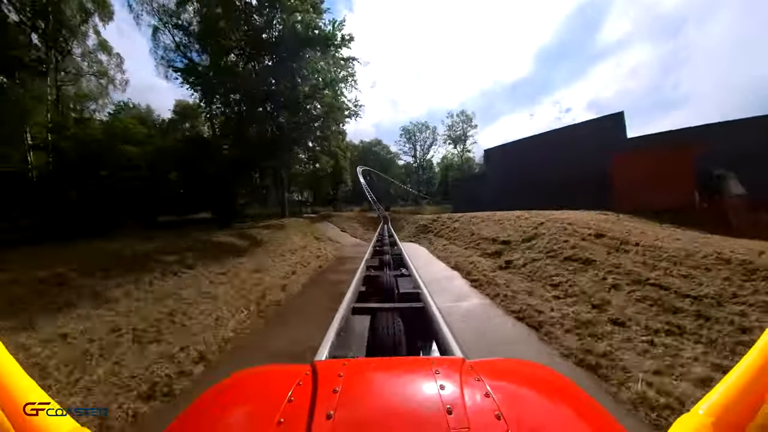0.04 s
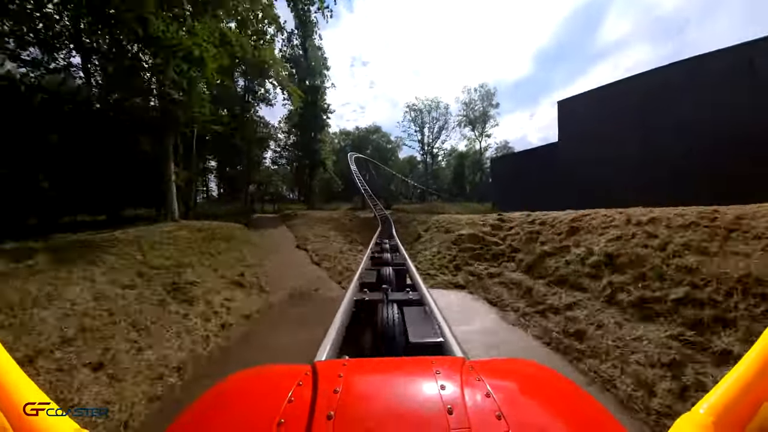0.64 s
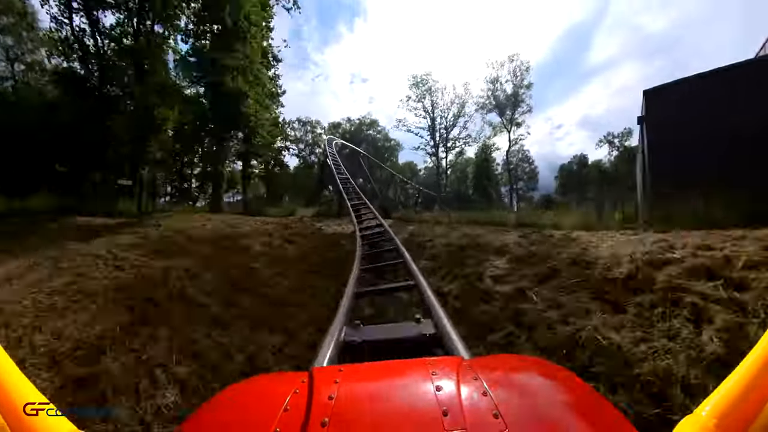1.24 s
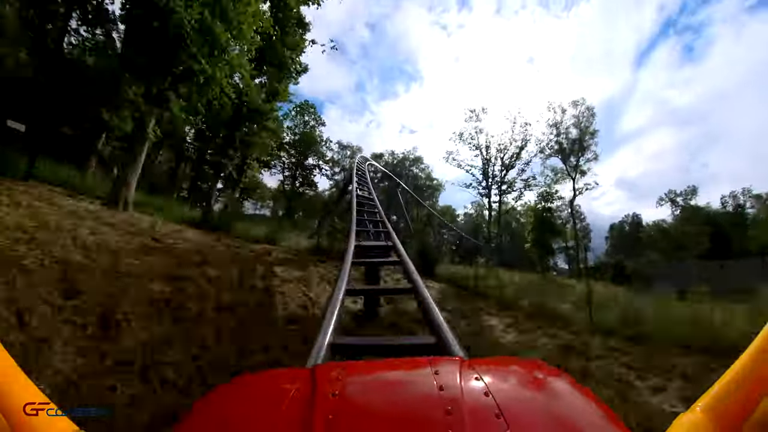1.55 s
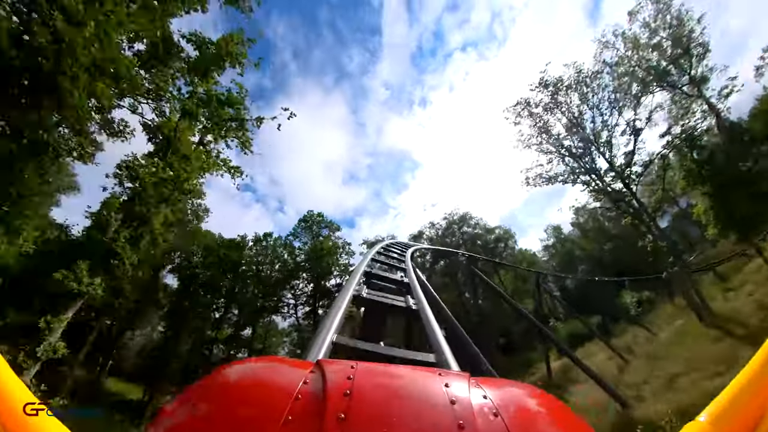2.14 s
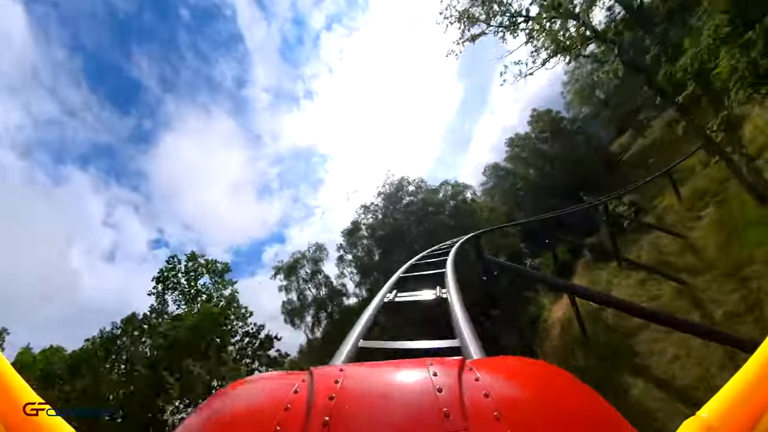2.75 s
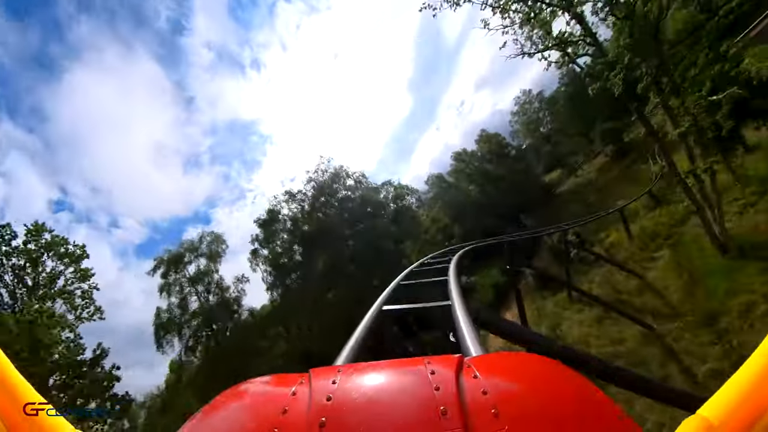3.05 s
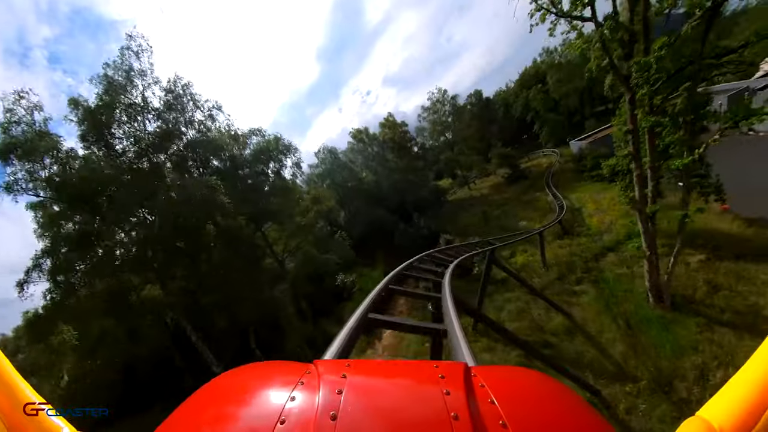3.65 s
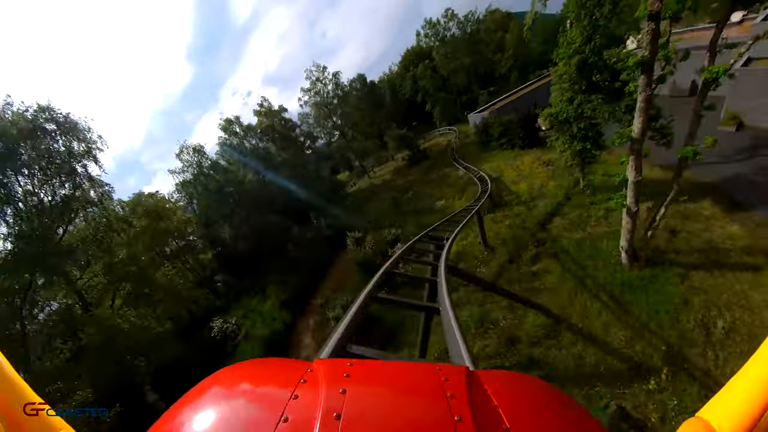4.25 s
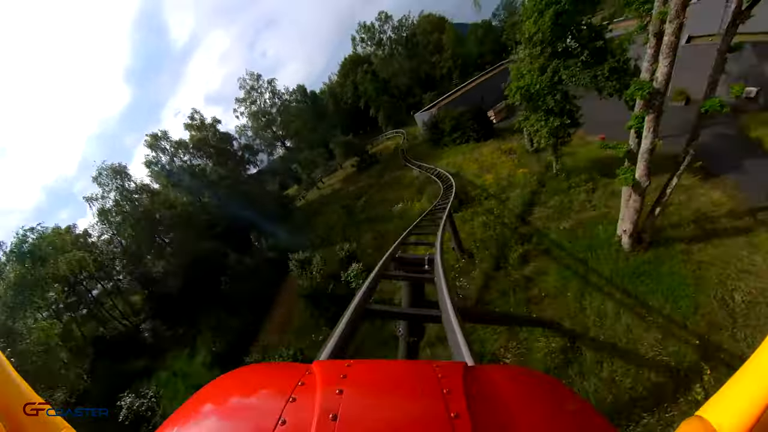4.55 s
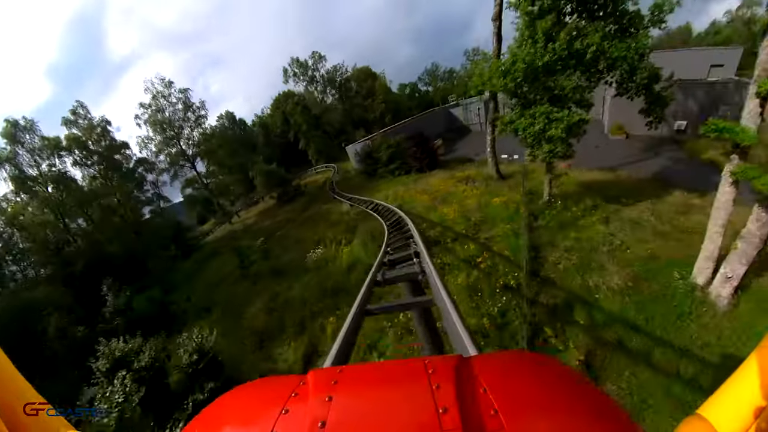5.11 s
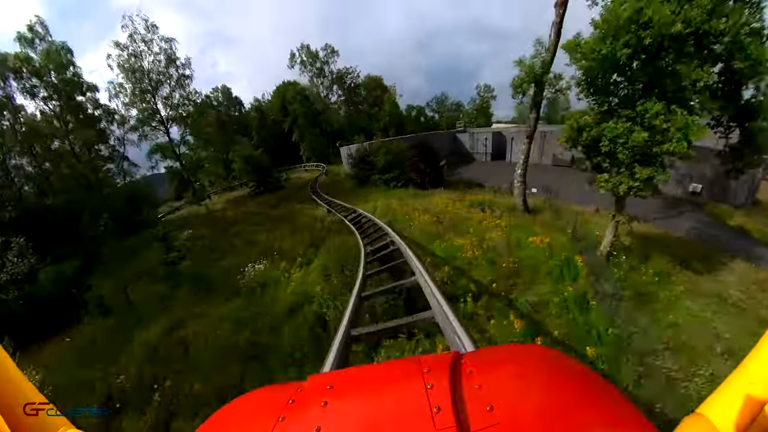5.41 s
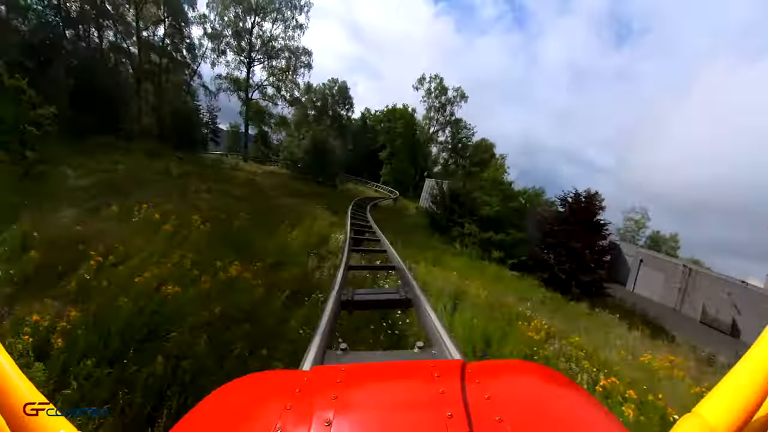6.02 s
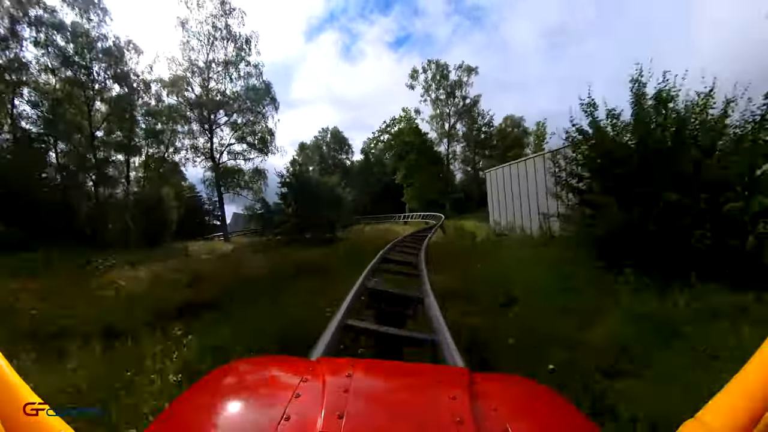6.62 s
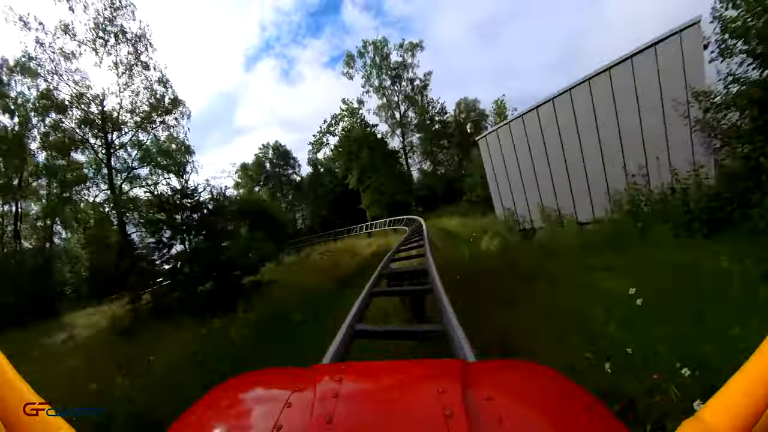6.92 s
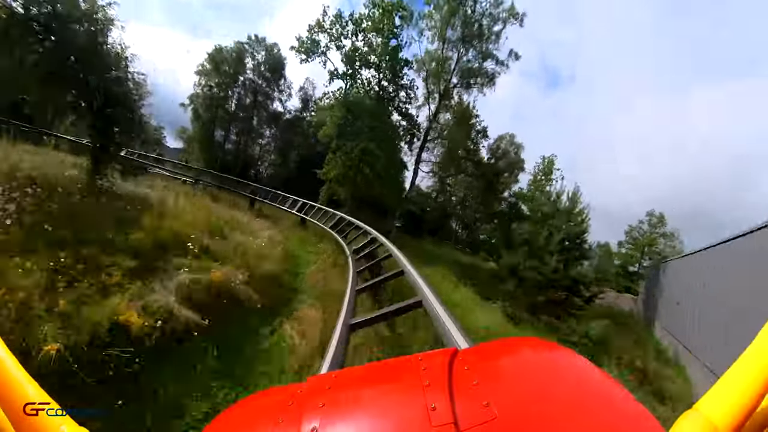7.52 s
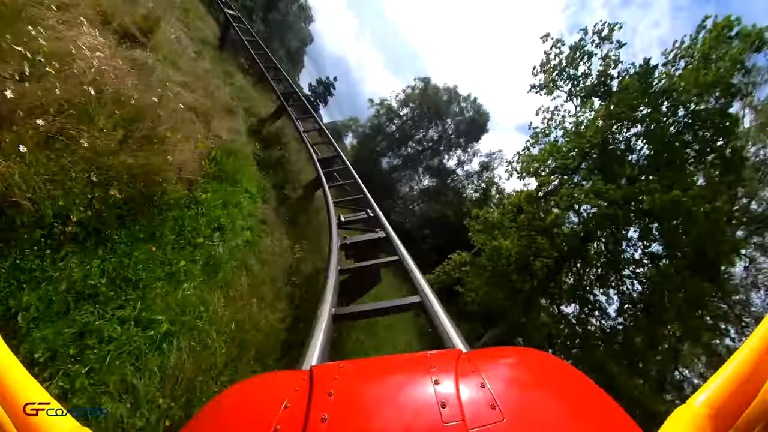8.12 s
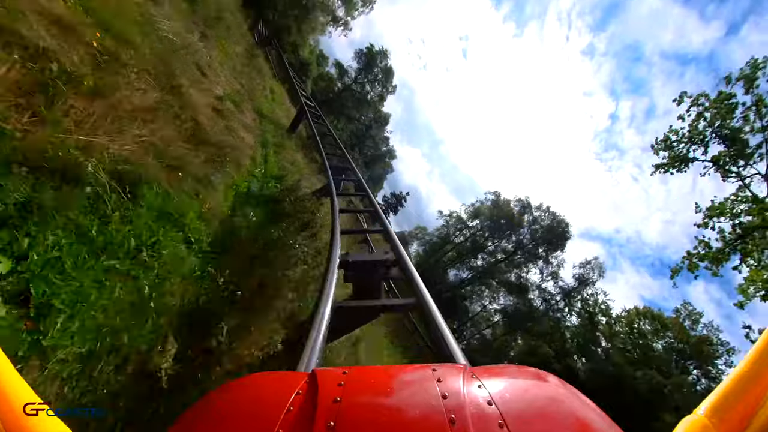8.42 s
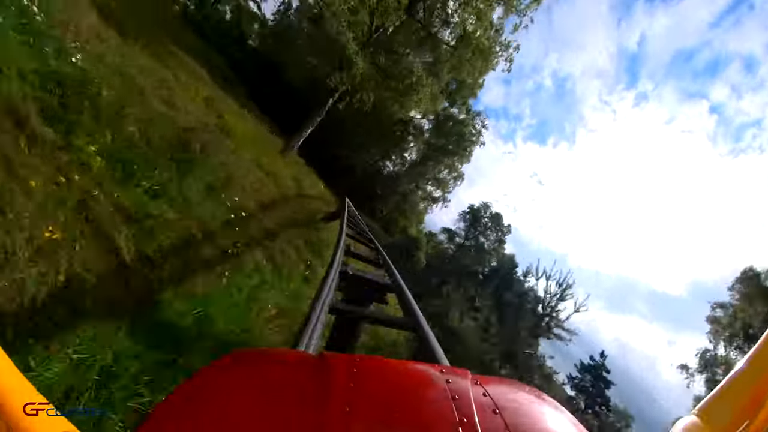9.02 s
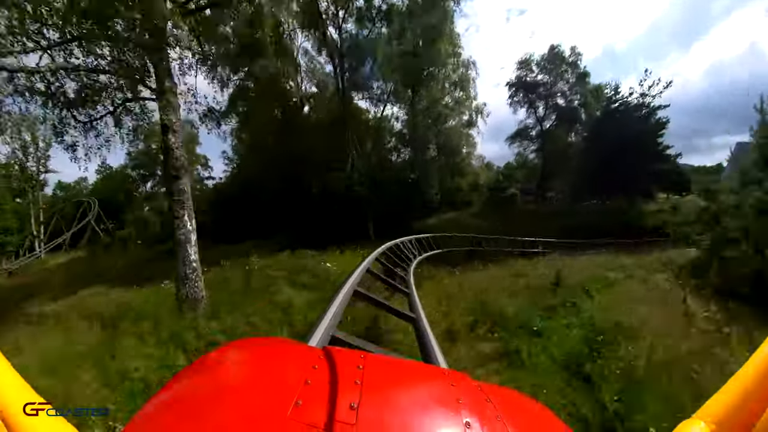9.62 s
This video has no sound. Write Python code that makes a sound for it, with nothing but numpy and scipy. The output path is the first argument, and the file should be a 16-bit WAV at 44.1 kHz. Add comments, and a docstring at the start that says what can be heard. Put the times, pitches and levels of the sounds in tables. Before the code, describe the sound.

Heard from the front seat, a coaster car throbs steadily over rough rail, its wheels growling and its loose fittings lightly clacking.

```python
"""A ride at the front of a small steel roller coaster. Air rushes past, and the rough rail drums
through the knocking wheels into the car's shell, which drones all the way. At 0.3 s the wheels hit a
rail joint, and loose fittings clack until 1 s. From 1.5 s the wheels growl, then howl, in the twists;
from 3.2 to 5 s the shell booms. More growls follow, and the fittings clack and scrape around 7 s.
A last growl at 8.3 s leads into a long boom. A fast limiter holds down the bass peaks throughout."""
import sys
import numpy as np
from scipy import signal
from scipy.fft import rfft, irfft
from scipy.io import wavfile
from scipy.ndimage import uniform_filter1d, minimum_filter1d

SR = 44100
rng = np.random.default_rng(int(sys.argv[2]) if len(sys.argv) > 2 else 0)


def master(y):
    """Save y as 16-bit WAV."""
    cut = np.clip(np.atleast_2d(y).T, -1, 1)
    pcm = np.round(cut * 32767)  # scale
    wavfile.write(sys.argv[1], SR, pcm.astype(np.int16))


N = 430416
TIME = np.arange(N) / SR

# The tone of the rushing air. Each row: frequency in Hz, relative level in dB.
AIR_TONE = [(30, -1.5), (120, -16), (220, -13), (350, 6), (550, 2), (850, 1.5), (1200, -9), (2000, -16),
            (2800, -18), (3900, -25), (5300, -34), (9500, -42.5), (12500, -40), (16000, -47)]
# How alike the air sounds in both ears. Each row: frequency in Hz, likeness (1 means the same).
AIR_LIKENESS = [(100, 0), (400, 0.8), (800, 0.07), (1500, 0.05), (3000, 0.03), (6000, 0.03), (12000, 0.3)]
# The air is louder on the left. Each row: frequency in Hz, left minus right in dB.
AIR_LEAN = [(200, 0.5), (500, 5.5), (800, 2.5), (1250, 11.5), (2500, 3.5), (3800, 7), (6000, 6), (8500, 0),
            (12000, 3)]

# Loose metal fittings clack. Each row: start in seconds, relative level in dB, seconds to fade
# by 60 dB, treble tilt in dB per octave, top frequency in Hz.
FITTING_CLACKS = [(0.272, -55, .06, 0.5, 15000), (0.2774, -49, 0.039, 1, 15900),
                  (0.283, -52.5, 0.1, -0.5, 15800), (0.304, -61, 0.11, 0.5, 14000),
                  (0.509, -58.5, 0.025, 6, 10900), (0.591, -62, 0.05, 0, 11000),
                  (0.617, -60, .04, 2, 11500), (0.636, -56.5, 0.075, 1, 12000),
                  (0.69, -57, 0.058, 1, 11500), (0.78, -62, 0.14, 0, 11500), (0.825, -64, 0.16, 2, 13000),
                  (0.887, -61, 0.092, -1, 11500), (0.97, -65, .2, -1, 10600), (6.448, -59, .1, 0, 4800),
                  (6.49, -52, 0.036, -2, 6900), (6.568, -53.5, 0.052, -1, 4600),
                  (6.583, -54, 0.13, -4, 5000), (6.61, -56, 0.082, -12, 4800), (6.632, -52, .05, -7, 4200),
                  (6.910, -49, 0.033, -2, 11000), (6.917, -43.5, 0.022, -2, 12500),
                  (6.932, -49.5, 0.035, 2, 5000), (6.949, -51, 0.03, -2, 4900),
                  (6.967, -50, 0.041, -10, 5000), (7.008, -47.5, 0.04, -3.5, 12500),
                  (7.02, -52, 0.025, -7, 4800), (7.05, -52.5, 0.035, -3, 10500),
                  (8.325, -70, .14, 4, 14000), (8.352, -69, 0.09, 11, 16000), (8.36, -66, .11, 1, 16000),
                  (9.406, -54, 0.093, -11, 4750)]
# The tone of a clack. Each row: frequency in Hz, relative level in dB.
CLACK_TONE = [(500, 2), (1000, 13), (2000, 2), (3200, 1.5), (3900, -2.5), (4600, -7), (5500, -10.5),
              (8000, -13), (10000, -13.5), (12500, -13), (16000, -11)]
# Small parts jiggle and a fitting scrapes. Each row: start and end in seconds, level in dB.
JIGGLE_TIMES = [(0.55, 0.77, -82), (0.79, 1.03, -78.5), (6.898, 7.08, -81)]
SCRAPE_TIMES = [(6.56, 6.637, -64), (6.912, 6.97, -60), (6.975, 7.07, -63.5)]
# A mode is a pitch at which a part likes to ring. These belong to the loose parts.
# Each row: pitch in Hz, width in Hz, relative level in dB.
CLACK_MODES = [(2010, 71, -9.5), (2710, 65, -6), (3650, 120, -2), (3930, 120, 3), (4300, 130, -1.5)]
JIGGLING_MODES = [(6500, 2500, -3), (9800, 2400, -1.5)]
SCRAPING_MODES = [(2900, 900, -0.5), (3860, 810, -3)]

# Wheels strike a rail joint. Each row: start in seconds, level in dB.
JOINT_STRIKES = [(0.272, -35), (0.278, -29.5), (0.307, -39)]
# The struck steel rings. Each row: pitch in Hz, relative level in dB, seconds to fade by 60 dB.
STEEL_MODES = [(484, 1.5, .17), (654, -15, 0.064), (970, -11, 0.058), (1570, -15, 0.046),
               (2130, -20.5, 0.045), (2490, -21, 0.04), (3050, -22, 0.04), (3850, -28, 0.045),
               (4530, -25, 0.05)]
# Wheels knock on uneven rail. Each row: start in seconds, level in dB, length in seconds, pitch in Hz.
WHEEL_KNOCKS = [(0.268, -30, 0.038, 480), (1.467, -20.5, 0.016, 420), (1.815, -31, 0.029, 580),
                (2.023, -32.5, 0.028, 430), (2.097, -36, 0.016, 480), (2.206, -29, 0.023, 310),
                (2.611, -37, 0.033, 620), (2.74, -36, .016, 540), (3.159, -30.5, 0.018, 460),
                (3.207, -29, 0.021, 420), (4.169, -34.5, 0.031, 380), (4.257, -32.5, 0.018, 430),
                (4.555, -37, 0.05, 600), (4.692, -38.5, 0.03, 480), (4.762, -40, 0.026, 470),
                (4.923, -33.5, 0.017, 500), (4.951, -36, 0.014, 520), (5.128, -36, 0.031, 520),
                (5.215, -31, 0.027, 570), (5.275, -35.5, 0.02, 537), (5.788, -36.5, 0.019, 540),
                (5.926, -35.5, 0.017, 500), (6.752, -40, 0.027, 550), (6.795, -33, 0.034, 520),
                (6.904, -35.5, 0.024, 520), (6.994, -35.5, 0.03, 560), (7.099, -33, 0.031, 430),
                (7.23, -40, 0.029, 660), (7.827, -38.5, 0.018, 450), (7.874, -38, 0.019, 430),
                (8.057, -40, 0.02, 500), (8.362, -26.5, 0.022, 560)]
# The modes of the carrier that holds the wheels. Each row: pitch in Hz, relative level in dB.
CARRIER_MODES = [(305, 2.5), (395, 3), (485, -1.5), (630, -4), (770, -7.5), (920, -12)]
# Guide wheels howl and the shell booms. Each row: start and end in seconds, level in dB, pitch in Hz.
WHEEL_HOWLS = [(2.315, 2.56, -32, 349.8), (2.56, 3.162, -35.5, 360), (5.056, 5.275, -38.5, 345),
               (7.195, 7.363, -34, 377.7), (7.254, 7.298, -28, 356), (8.27, 8.452, -37.5, 355)]
SHELL_BOOMS = [(0.543, 1.207, -31.5, 201.4), (3.236, 3.56, -28, 115.9), (3.44, 3.823, -23.5, 171.2),
               (3.786, 4.17, -24.5, 132.1), (3.92, 4.2, -27.5, 172), (4.21, 4.64, -26, 175.3),
               (4.317, 4.648, -26.5, 137), (4.67, 5.012, -28, 116), (4.745, 4.925, -27, 176.2),
               (8.496, 9.766, -28.5, 172.1)]

# How rough the rail is. Each row: time in seconds, dB above ordinary rail.
RAIL_ROUGHNESS = [(0, 1.5), (.45, 1), (1.0, 3.5), (1.27, 0), (1.6, -2.5), (2.3, 0.5), (3.1, -5), (3.3, 2.5),
                  (3.9, -5.5), (4.25, -3), (4.5, -1), (4.85, -4.5), (5.05, 0), (5.6, 0.5), (6.1, -0.5),
                  (6.5, -0.5), (7.7, -2), (8.1, 1), (8.25, -2), (8.6, 2), (9.0, 2.5), (9.25, -0.5),
                  (9.5, 3.5), (9.76, -3.5)]
# The low shudder of the car's frame. Each row: time in seconds, level in dB.
FRAME_SHUDDER = [(0, -56), (.12, -32), (.28, -39.5), (.85, -37), (1.02, -33), (1.25, -37.5), (1.5, -32.5),
                 (1.8, -28), (2.1, -33), (2.45, -35.5), (2.65, -30), (3.0, -28), (3.2, -35.5), (3.9, -37),
                 (4.3, -35), (4.6, -34), (5.0, -33.5), (5.18, -32), (5.55, -32.5), (5.85, -34.5),
                 (6.15, -41), (6.35, -32.5), (6.8, -39), (7.22, -34.5), (7.5, -43.5), (7.95, -38.5),
                 (8.45, -34.5), (8.95, -35), (9.5, -40.5)]
# Panels shake harder, and wheels growl in the twists. Each row: start and end in seconds, level in dB.
PANEL_SURGES = [(0.87, 1.058, -32.5), (5.518, 5.684, -27), (5.863, 5.957, -29.5), (6.362, 6.603, -32.5),
                (8.034, 8.12, -25.5)]
WHEEL_GROWLS = [(1.46, 2.254, -34.5), (2.272, 3.16, -33.5), (5.027, 5.303, -37.5), (6.624, 6.905, -37.5),
                (7.085, 7.367, -35), (8.28, 8.453, -29.5)]
# The drone drops out briefly. Each row: middle in seconds, length in seconds, depth in dB.
DRONE_LULLS = [(1.443, 0.047, 19), (3.188, 0.021, 16), (5.025, 0.025, 6), (5.163, 0.08, 8),
               (6.666, 0.05, 13.5), (6.872, 0.075, 11), (8.25, 0.05, 16), (8.44, 0.029, 15)]
# The modes of the parts that the rail shakes. Each row: pitch in Hz, width in Hz, relative level in dB.
FRAME_MODES = [(38, 16, -16.5), (67.8, 30, -4.5), (93.4, 25, -0.7)]
PANEL_MODES = [(207, 24, -10), (246.5, 28, -9), (277.7, 31.3, -7)]
WHEEL_MODES = [(282.8, 30, -3), (329, 46, -0.5), (376.4, 40, -2)]
TREAD_MODES = [(474, 90, 0.5), (655, 220, -4)]
SHELL_MODES = [(112.94, 16, -5), (137, 23.9, 0), (171.64, 17.3, 1), (198.8, 35, -9.5)]

DRONE_DB, BUZZ_DB, RUMBLE_DB, RUSH_DB = -22.5, -35, -46, -43.5  # base levels: shell, panels, wheels, air
GROWL_FADE_S = .06


def from_db(db):
    """Turn decibels into a number to multiply by."""
    return 10 ** (np.asarray(db) / 20)


def rms_one(x):
    """Scale a sound so that its average power is 1."""
    return x / np.sqrt(np.mean(x ** 2) + 1e-20)


def steady(x, span_s):
    """Even out a sound so that its power stays near 1 over each short span."""
    return x / np.sqrt(uniform_filter1d(x * x, max(int(span_s * SR), 2)) + 1e-12)


def in_time(points):
    """Join the points of a curve with straight lines, one value per sample."""
    return np.interp(TIME, *np.transpose(points))


def at_hz(points, hz):
    """Read a curve at the given frequencies, with octaves evenly spaced."""
    point_hz, value = np.transpose(points)
    return np.interp(np.log(np.maximum(hz, 1)), np.log(point_hz), value)


def held(start, end, fade_s):
    """Fade from 0 up to 1, hold, and fade back down."""
    return np.clip(np.minimum(TIME - start, end - TIME) / fade_s + .5, 0, 1)


def drift(rate_hz):
    """A smooth random wobble, about 1 in size; a higher rate wobbles faster."""
    step, warm_up = 40, 2000  # one value every 40 samples; the first 2000 are thrown away
    memory = np.exp(-2 * np.pi * step * rate_hz / SR)
    noise = rng.standard_normal(N // step + warm_up + 2)
    slow = signal.lfilter([1], [1, -2 * memory, memory * memory], noise)[warm_up:]
    return np.interp(np.arange(N) / step, np.arange(len(slow)), rms_one(slow))


def waver(hz, wander, rate_hz):
    """One ringing tone whose pitch wanders by a small share."""
    cycles = np.cumsum(hz * (1 + wander * drift(rate_hz))) / SR + rng.random()
    return np.sqrt(2) * np.sin(2 * np.pi * cycles)


def resonate(x, hz, width):
    """Keep only the band of a sound around one mode."""
    edges = np.clip([hz - width / 2, hz + width / 2], 10, .45 * SR)
    return signal.sosfilt(signal.butter(2, edges, "band", fs=SR, output="sos"), x)


def shake(modes, bumpy_db, span_s):
    """Rough contact shakes each mode of a part at random; the sum is evened out."""
    contact = from_db(bumpy_db * drift(19))
    out = 0
    for hz, width, db in modes:
        # a lead-in lets the mode ring from the very start
        force = np.pad(contact * rng.standard_normal(N), (SR // 4, 0), mode="reflect")
        out = out + from_db(db) * rms_one(resonate(force, hz, width)[-N:])
    return steady(out, span_s)


def air_rush(flutter_db):
    """Rushing air and wheel hiss, different at each ear and stronger on the left."""
    hz = np.fft.rfftfreq(N, 1 / SR)
    mid, side = rfft(rng.standard_normal((2, N)))
    alike, left_right = at_hz(AIR_LIKENESS, hz), np.array([[1], [-1]])
    ears = np.sqrt(1 + alike) * mid + np.sqrt(1 - alike) * side * left_right
    tone = from_db(at_hz(AIR_TONE, hz) + left_right * at_hz(AIR_LEAN, hz) / 2)
    return rms_one(irfft(ears * tone, N)) * from_db(RUSH_DB + flutter_db * drift(45))


def clacks(rise_s, grain_db, stereo_width):
    """A loose fitting chatters: each clack is a dying burst of tiny contacts."""
    out, t = np.zeros((2, N)), TIME[:SR // 3]
    hz = np.fft.rfftfreq(len(t), 1 / SR)
    grains = steady(from_db(grain_db * drift(400)), span_s=0.012)
    for start, db, decay_s, tilt_db, top_hz in FITTING_CLACKS:
        at = int(start * SR)
        contacts = rng.standard_normal((2, len(t))) * np.roll(grains, -at)[:len(t)]
        tone = from_db(at_hz(CLACK_TONE, hz) + tilt_db * np.log2(np.clip(hz, 2500, 10000) / 2500))
        # small parts give off no bass, and the length of a contact limits its treble
        tone *= hz / (hz + 400) / np.sqrt(1 + (hz / top_hz) ** 20)
        mid, side = rms_one(irfft(rfft(contacts) * tone, len(t)))
        fade = from_db(db - 60 * t / decay_s) * (1 - np.exp(-t / rise_s))
        sound = (mid + stereo_width * side * [[1], [-1]]) * fade
        out[:, at:at + len(t)] += sound[:, :N - at]
    return out


def fittings():
    """Loose metal clacks and rings, over short scrapes and the rustle of jiggling parts."""
    contacts = clacks(rise_s=0.0014, grain_db=5.5, stereo_width=.3)
    ringing = sum(from_db(db) * resonate(contacts, hz, width) for hz, width, db in CLACK_MODES)
    jiggle = sum(from_db(db) * held(start, end, .1) for start, end, db in JIGGLE_TIMES)
    jiggle *= from_db(2.8 * drift(120)) * shake(JIGGLING_MODES, bumpy_db=4, span_s=.05)
    scrape = sum(from_db(db) * held(start, end, 0.032) for start, end, db in SCRAPE_TIMES)
    scrape *= shake(SCRAPING_MODES, bumpy_db=4, span_s=.03)
    return from_db(7.0) * (contacts + ringing) + jiggle + scrape


def rail_joint():
    """Each wheel that crosses the joint sets the steel ringing."""
    out, t = np.zeros(N), TIME[:SR // 3]
    for start, db in JOINT_STRIKES:
        at = int(start * SR)
        for hz, mode_db, decay_s in STEEL_MODES:
            fade = from_db(db + mode_db + rng.normal(0, 1) - 60 * t / decay_s)
            out[at:at + len(t)] += fade * np.sin(2 * np.pi * hz * t * rng.normal(1, 0.014))
    return out


def knocks(reach_octaves, detune, wander_hz):
    """A rough patch jolts the wheel carrier, most in the modes near the knock's own pitch."""
    out = np.zeros(N)
    hz, mode_db = np.transpose(CARRIER_MODES)
    for start, db, length, knock_hz in WHEEL_KNOCKS:
        swell = np.sqrt(np.hanning(int(length * SR) + 3))
        share = from_db(mode_db) / (1 + (np.log2(hz / knock_hz) / reach_octaves) ** 2)
        # the rough contact keeps pulling each mode off its pitch
        pull = rms_one(uniform_filter1d(rng.standard_normal((len(swell), len(hz))), size=200, axis=0))
        pitch = hz * rng.normal(1, detune, len(hz)) + wander_hz * pull
        cycles = np.cumsum(pitch, axis=0) / SR + rng.random(len(hz))
        at = int(start * SR)
        out[at:at + len(swell)] += from_db(db) * swell * rms_one(np.sin(2 * np.pi * cycles) @ share)
    return out


def howls(fade_s):
    """Pressed sideways against the rail, the guide wheels howl on a wavering pitch."""
    return sum(from_db(db) * held(start, end, fade_s) * waver(hz, wander=0.0499, rate_hz=30.1)
               for start, end, db, hz in WHEEL_HOWLS)


def shudder():
    """The rail shakes the car's frame in the deep bass."""
    return from_db(in_time(FRAME_SHUDDER)) * shake(FRAME_MODES, bumpy_db=1.5, span_s=0.084)


def panels(rough_db, fade_s):
    """The panels buzz with the rail's roughness and in short surges."""
    surge = sum(from_db(db) * held(start, end, fade_s) for start, end, db in PANEL_SURGES)
    return np.hypot(from_db(BUZZ_DB + rough_db), surge) * shake(PANEL_MODES, bumpy_db=3.0, span_s=0.1)


def wheels(rough_db, tread_db, tread_growl_db):
    """The wheels rumble on rough rail and growl in the twists; their treads add a higher rasp."""
    growl = sum(from_db(db) * held(start, end, GROWL_FADE_S) for start, end, db in WHEEL_GROWLS)
    rumble = from_db(RUMBLE_DB + rough_db)
    body = np.hypot(rumble, growl) * shake(WHEEL_MODES, bumpy_db=2.5, span_s=0.096)
    rasp = np.hypot(from_db(tread_db) * rumble, from_db(tread_growl_db) * growl)
    return body + rasp * shake(TREAD_MODES, bumpy_db=0.5, span_s=0.018)


def booms(fade_s):
    """The shell's low modes take turns to swell, and pulse where they overlap."""
    out = np.zeros(N)
    for start, end, db, hz in SHELL_BOOMS:
        swell = from_db(db + 2.2 * drift(14)) * held(start, end, fade_s)
        out += swell * waver(hz, wander=0.0448, rate_hz=19.9)
    return out


def drone(rough_db, throb_db):
    """The car's shell throbs, fullest on smooth rail, and sinks in growls, lulls and booms."""
    # it sinks by about a quarter of each growl's rise over the ordinary rumble
    dip_db = sum(0.26 * (db - RUMBLE_DB) * held(start, end, GROWL_FADE_S)
                 for start, end, db in WHEEL_GROWLS)
    dip_db += sum(depth * held(middle - length / 2, middle + length / 2, length / 2)
                  for middle, length, depth in DRONE_LULLS)
    # a boom as loud as the drone would take 2 dB from it
    dip_db += sum(2 * from_db(db - DRONE_DB) * held(start, end, .1) for start, end, db, _ in SHELL_BOOMS)
    level_db = DRONE_DB - 0.36 * rough_db - dip_db + throb_db * drift(8.2)
    return from_db(level_db) * shake(SHELL_MODES, bumpy_db=2.5, span_s=0.063)


def scene():
    """The car's shaking is the same in both ears; the air and the clacks differ left and right."""
    rough_db = in_time(RAIL_ROUGHNESS)
    car = drone(rough_db, throb_db=1) + wheels(rough_db, tread_db=-8.5, tread_growl_db=-12.5)
    car += panels(rough_db, fade_s=0.022) + booms(fade_s=0.077) + shudder()
    car += knocks(reach_octaves=0.57, detune=.04, wander_hz=34.3) + howls(fade_s=0.017) + rail_joint()
    return car + air_rush(flutter_db=0.73) + fittings()


def limiter(x, ceiling_db, release_db_per_s):
    """Look a few milliseconds ahead, turn each peak down to the ceiling and recover quickly."""
    over_db = np.maximum(20 * np.log10(np.abs(x).max(axis=0) + 1e-9) - ceiling_db, 0)
    cut_db = np.maximum.accumulate(over_db + release_db_per_s * TIME) - release_db_per_s * TIME
    return x * from_db(uniform_filter1d(minimum_filter1d(-cut_db, size=260), size=260))


def record(dry):
    """Limit the bass below 750 Hz on its own, then cut the treble above 15700 Hz."""
    bass = signal.sosfiltfilt(signal.butter(2, 750, fs=SR, output="sos"), dry)
    limited = limiter(bass, ceiling_db=-20.2, release_db_per_s=302.5) + dry - bass
    return signal.sosfilt(signal.ellip(10, .1, 80, 15700, fs=SR, output="sos"), limited)


dry = scene()
out = record(dry)
master(out)
```